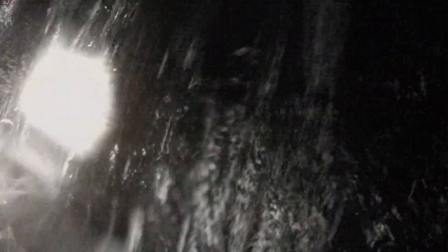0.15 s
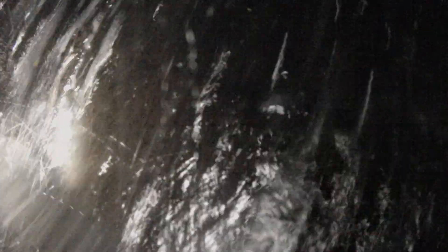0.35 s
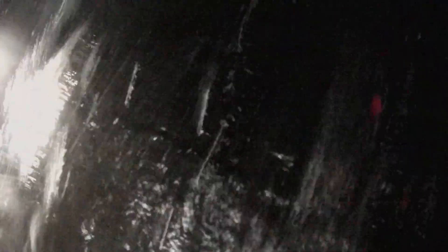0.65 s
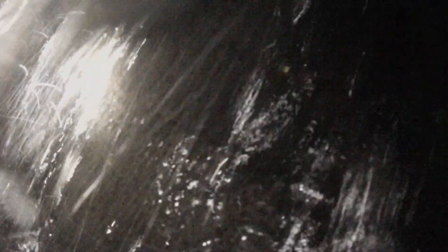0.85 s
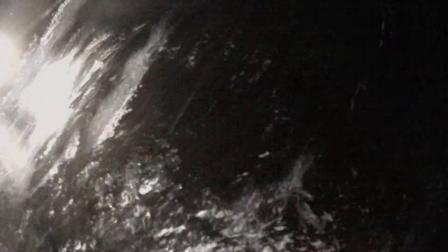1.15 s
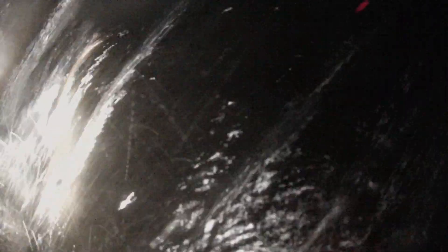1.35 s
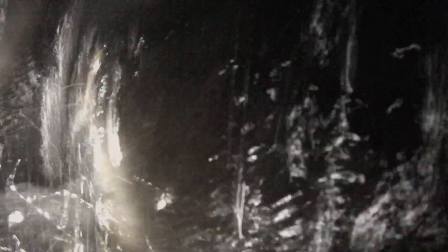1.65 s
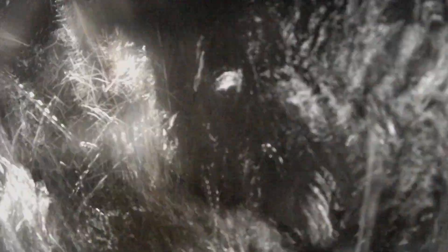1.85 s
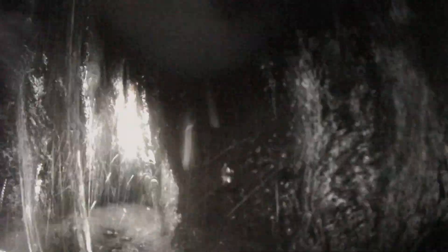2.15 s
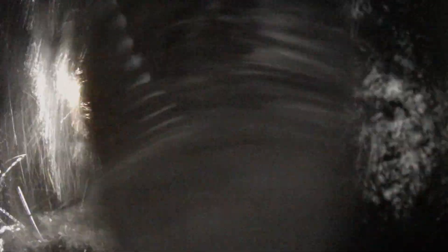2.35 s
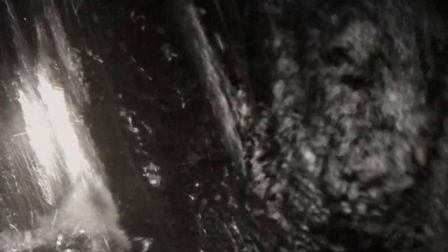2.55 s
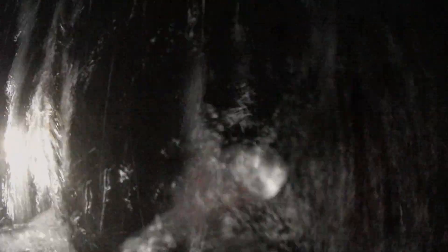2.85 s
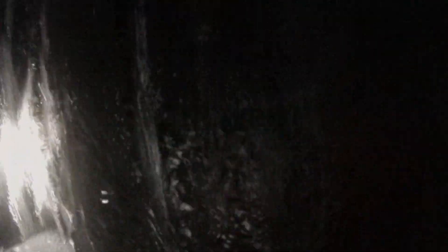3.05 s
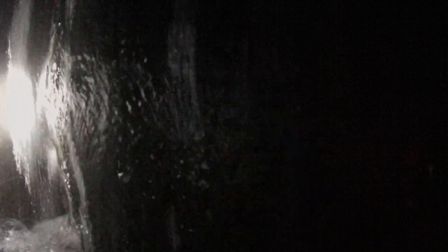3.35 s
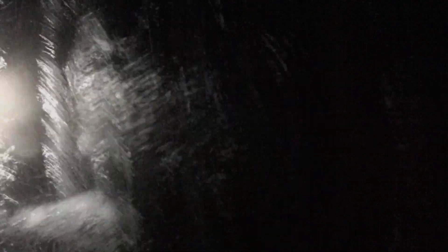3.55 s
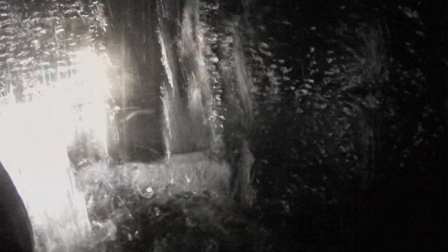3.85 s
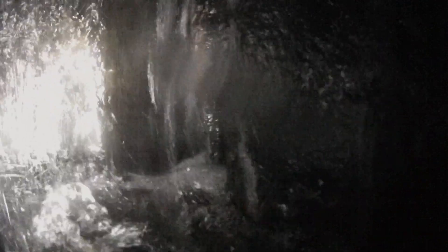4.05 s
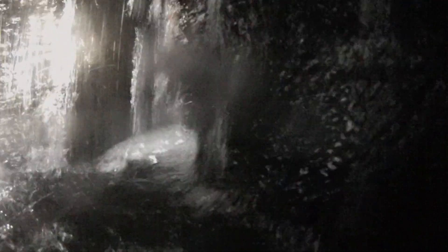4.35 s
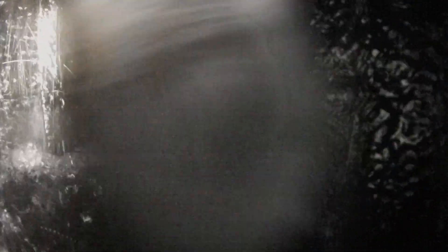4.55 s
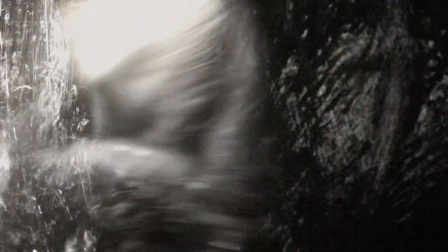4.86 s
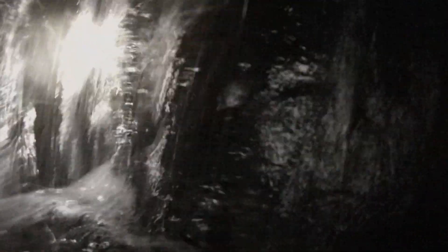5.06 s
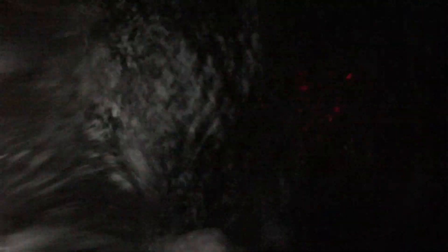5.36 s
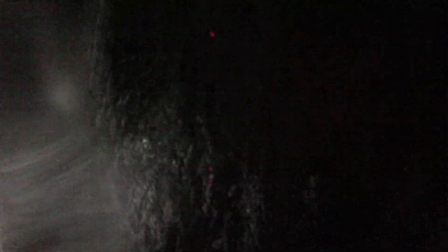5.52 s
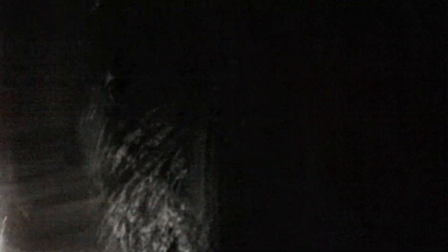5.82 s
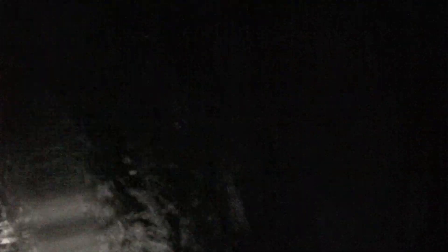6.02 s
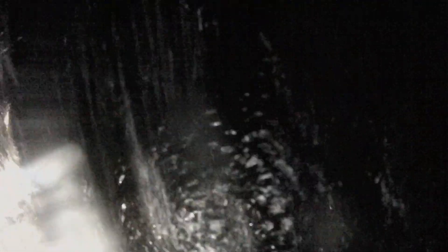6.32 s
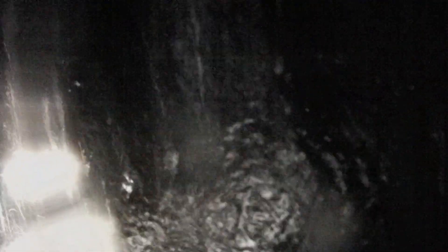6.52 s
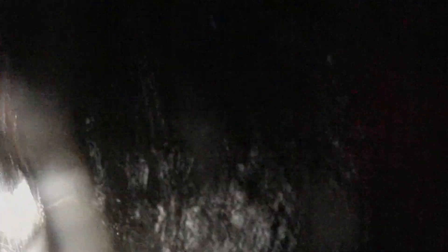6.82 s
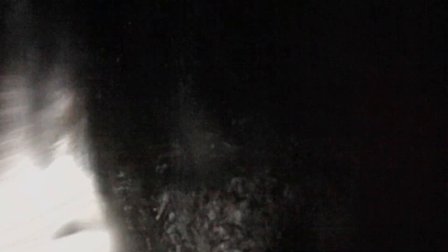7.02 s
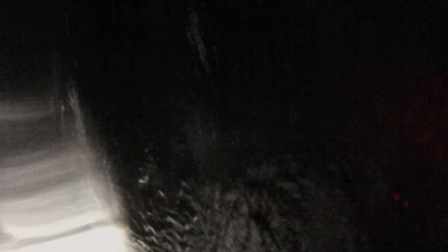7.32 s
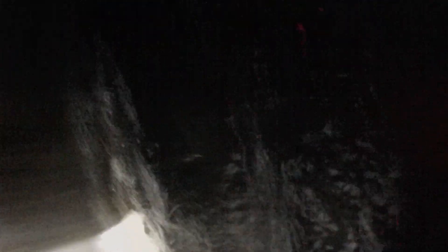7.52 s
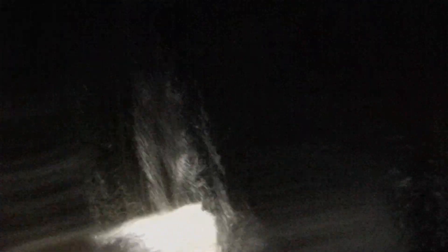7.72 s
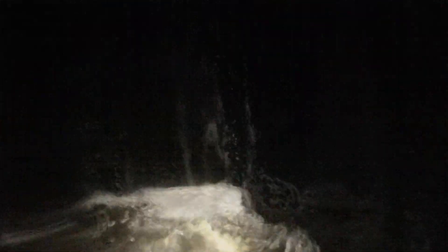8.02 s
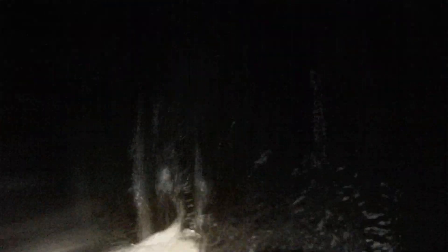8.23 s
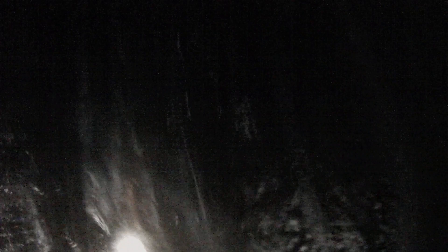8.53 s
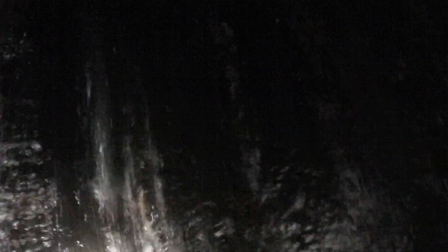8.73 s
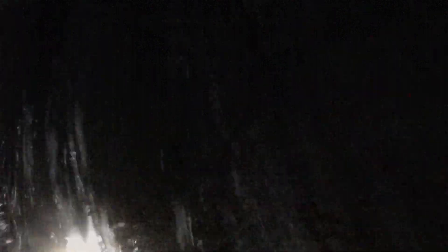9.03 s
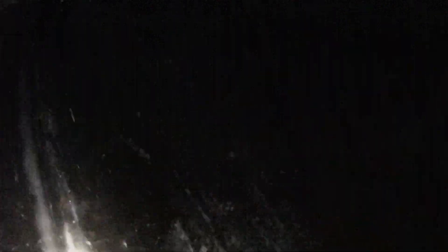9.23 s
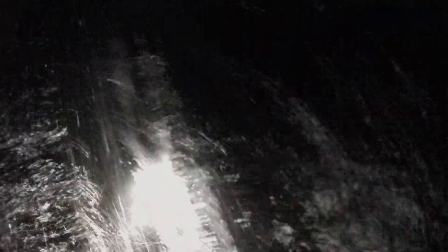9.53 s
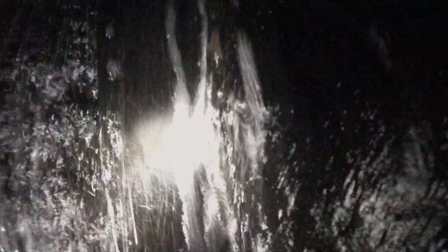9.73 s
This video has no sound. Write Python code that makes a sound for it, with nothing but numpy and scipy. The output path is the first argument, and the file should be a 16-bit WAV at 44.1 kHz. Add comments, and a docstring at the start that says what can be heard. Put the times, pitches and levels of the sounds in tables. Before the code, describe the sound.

Water spray hisses and patters right against the microphone case, dull thuds and sharp splats punctuating it, thinning before low rumble swells near the end.

```python
"""Inside a concrete dam outlet, a hand-held camera goes through falling spray: noise bubbles make a steady rush.
From the start, drops, gobs and droplets splat close on the housing: noise bursts lifted by the port's resonances.
From 1.5 s, bumps thud through the case as damped swings, knocks and beating modes; the hardest come near 3.8 and 5 s.
The hardest hits duck the gain, and the rush slowly swells back; around 7.5 s the spray thins.
From 8.3 s the rumble of draught and grip, lumpy low noise, grows until 9.35 s, then eases."""
import sys
import numpy as np
from scipy import signal
from scipy.fft import rfft, irfft, next_fast_len
from scipy.io import wavfile
from scipy.ndimage import uniform_filter1d, map_coordinates

SR = 44100
rng = np.random.default_rng(int(sys.argv[2]) if len(sys.argv) > 2 else 0)


def materialize(psi):
    """Save the field psi as 16-bit PCM at rate SR to the path in sys.argv[1].

    A 1-D psi becomes a single channel; in a 2-D psi each row is a channel.
    """
    bounded = np.clip(np.atleast_2d(psi).T, -1, 1)
    quanta = np.round(bounded * 32767).astype(np.int16)
    wavfile.write(sys.argv[1], SR, quanta)


N = 435708

# the falling sheet of water, duller when the microphone faces away: [t/s, level/dB, treble/dB]
RUSH_COURSE = [(0, -32.5, -0.5), (.85, -29.5, 0.5), (1.2, -31, .8), (1.7, -29.5, -2), (2.1, -30, 0.5),
               (2.6, -34.5, -1), (3.1, -33, 1.3), (4.0, -33, 1), (4.8, -27, -2.5), (5.2, -29, 0),
               (5.8, -31.5, -1), (6.3, -35.5, 0), (6.7, -31.5, 2), (7.2, -32.5, -1), (7.8, -37.5, -1),
               (8.5, -35, -2.5), (9.2, -32.5, 2.5), (9.87, -31, -1)]
# how thickly the spray falls on the housing: [t/s, level/dB]
SPRAY_COURSE = [(0, -31), (.6, -37), (1.35, -38), (1.9, -26), (2.3, -25), (2.65, -48.5), (2.87, -29),
                (3.5, -35), (3.7, -26), (4.6, -41), (5.02, -21), (5.3, -30), (5.5, -22), (6.1, -30),
                (6.45, -41.5), (6.67, -29), (7.18, -31), (7.5, -54), (8.25, -40), (9.05, -44), (9.33, -30),
                (9.87, -32)]
# draught and handling rumble: [t/s, level/dB]
RUMBLE_COURSE = [(0, -53), (1.2, -57.5), (1.9, -50.5), (2.6, -54), (3.5, -53.5), (4.8, -41.5), (5.3, -48),
                 (6.4, -44), (7.3, -43.5), (7.7, -48), (8.3, -51.5), (8.8, -39.5), (9.35, -36.5),
                 (9.87, -46.5)]
# hard drops that strike the housing: [t/s, splat peak/dB, centre f/Hz, burst length/s]
HARD_DROPS = [(0.4058, -3, 2320, 0.0052), (0.526, -6.5, 2040, .0024), (.612, -8.5, 2170, 0.0026),
              (.933, 8.5, 2990, 0.0012), (1.755, -7.5, 2230, 0.0049), (1.7806, 5.5, 4120, .006),
              (1.947, 7.5, 4270, 0.00074), (2.03, -2, 2030, 0.011), (2.084, -3.5, 1730, 0.0034),
              (2.135, 1, 3850, 0.0082), (2.249, -2, 2560, .0026), (2.302, -6, 10200, .002),
              (2.431, 3, 2100, .0017), (2.5087, -5, 7500, .0037), (2.5723, -3, 2200, 0.0049),
              (2.5853, -0.5, 6340, 0.0015), (2.9534, -7, 2290, 0.0044), (3.1244, -4.5, 1970, .0033),
              (3.318, -8, 6500, 0.0023), (3.3626, -4, 1780, .004), (3.6635, 6.5, 1030, 0.0075),
              (3.752, 1.5, 3000, 0.0037), (3.8244, 16, 1770, 0.0013), (4.629, -1, 2490, .0066),
              (5.2572, 9, 2660, 0.0049), (5.385, -1.5, 2730, 0.0014), (5.443, 0.5, 2480, .004),
              (5.4793, 4.5, 2420, 0.0039), (6.4672, -3.5, 6030, 0.0024), (6.586, -6, 3000, 0.0019),
              (6.779, 11, 2380, 0.0025), (6.8908, 7, 5200, 0.0016), (7.112, -5, 3740, .002),
              (7.227, -6.5, 2320, 0.0026), (7.299, -1.5, 2870, 0.0054), (7.411, -7.5, 5460, 0.0023),
              (7.4761, 5, 5740, 0.0011), (7.6846, 1, 4570, 0.0024), (8.0247, 0, 7430, 0.00084),
              (8.085, 6, 2540, 0.0038), (8.106, -3, 7000, 0.0018), (8.126, 0.5, 4000, 0.0011),
              (8.164, -5.5, 9440, 0.0016), (8.567, -4, 2660, 0.0013), (8.631, -6, 2920, .0015),
              (8.694, 0.5, 4200, 0.00035), (8.7752, -6.5, 1690, 0.0026), (8.904, -5, 2720, 0.004),
              (9.425, 1, 5930, 0.00062), (9.434, -4.5, 6800, 0.0046), (9.569, -6.5, 2980, 0.0048),
              (9.687, -4.5, 7270, 0.0025), (9.711, -7, 2250, 0.0033), (9.767, -3, 1650, 0.0034)]
# soft gobs of water that slap over the microphone port: [t/s, splat peak/dB, burst length/s]
LOUD_SLAPS = [(.1986, -0.5, 0.0054), (1.6565, -10, 0.0094), (1.805, -3.5, .002), (1.864, 2, 0.0036),
              (1.887, -6.5, 0.01), (1.908, -7, 0.0074), (2.021, 6, 0.012), (2.153, -4, 0.013),
              (2.167, -3.5, 0.011), (2.274, -4, 0.01), (2.92, -5.5, 0.0053), (2.931, -4.5, 0.0084),
              (3.065, -4.5, 0.0035), (3.497, -2.5, 0.0026), (3.673, -2.5, 0.011), (3.714, -8, .003),
              (4.931, 2.5, 0.0082), (4.971, -9.5, 0.004), (5.485, -5, 0.0086), (5.5654, 5.5, 0.0058),
              (5.7245, -3, 0.0067), (5.889, -5, .007), (5.904, -5, 0.0067), (5.9244, 1, 0.0018),
              (5.935, 1, 0.0048), (5.9975, -8.5, 0.0075), (6.07, -1, 0.0047), (6.214, -4.5, .003),
              (6.751, -1, .007), (6.953, -0.5, 0.0068), (6.981, 1.5, 0.0031), (7.1414, -5, 0.0026),
              (7.172, 0, 0.0029), (7.332, -6, 0.0028), (7.546, -5.5, 0.0028)]
# bumps on the case: [t/s, push/dB, push f/Hz, case ring/dB, knock/dB]
BUMPS = [(1.485, -48, 170, -22.5, -42), (1.576, -40, 139, -19.5, -36), (1.884, -20.5, 45, -28, -40),
         (2.124, -15.5, 57, -21, -21), (3.6634, -34, 200, -3, 5.5), (3.725, -2, 315, 4, 8),
         (3.7356, -2, 300, -4.5, 3), (3.825, 9, 324, 0, 11.5), (3.933, -1.5, 403, 0, -6.5),
         (4.335, -23, 143, -20, -34), (4.99, 12.5, 260, 5.5, -8), (5.545, -32, 284, -9, -5.5),
         (5.749, -22.5, 74, -33, -40), (5.925, -3.5, 109, -22.5, -11), (5.979, -13, 153, -27, -31),
         (6.142, -41, 220, -13, -26), (6.234, -19.5, 152, -36.5, -30), (6.699, -9.5, 194, -8.5, -11),
         (6.708, -10, 152, -11, -21), (7.169, -7, 170, -4, -9), (7.257, -14, 151, -17.5, -40),
         (7.42, -20.5, 130, -26, -31), (9.173, -15, 55, -26, -9.5), (9.335, -18.5, 100, -25.5, -27),
         (9.427, -20, 110, -24, -33)]
# relative spectrum of the rush, ahead of the port: [f/Hz, level per Hz/dB]
RUSH_SPECTRUM = [(30, -14), (172, -14), (238, -2), (320, -13.5), (500, -12), (770, -9), (1100, -13),
                 (1750, -1.5), (2300, -3), (4000, -8.5), (5700, -7), (8200, -13), (12500, -10.5),
                 (15300, -20.5)]
# relative spectrum of the spray, ahead of the port: [f/Hz, level per Hz/dB]
SPRAY_SPECTRUM = [(40, -18), (178, -12), (238, 0), (320, -16), (500, -33), (780, -6), (1200, -3),
                  (2200, 0.5), (3600, -4), (4400, -21.5), (7000, -32), (15000, -34)]
# relative spectrum of the rumble: [f/Hz, level per Hz/dB]
RUMBLE_SPECTRUM = [(10, -20), (30, -4.5), (90, -6.5), (180, -6.5), (400, -31), (1200, -52)]
# relative spectrum of a bump's dull knock: [f/Hz, level per Hz/dB]
KNOCK_SPECTRUM = [(60, -1), (300, -16.5), (1100, 2), (2400, -5.5), (5000, -33.5), (15000, -56)]
# resonances of the housing and its microphone port: [f/Hz, width/Hz, lift/dB]
PORT_RESONANCES = [(755, 204, 7.5), (2178, 644, 12), (2467, 190, 3), (2630, 61, -2), (3482, 274, 8),
                   (5670, 870, 10), (7300, 600, 8.5), (9480, 1650, 6)]

CASE_HZ = 227.6  # nominal pitch of the upper of the case's two low modes
TOP_HZ = 15450  # nothing is kept above this
SLAP_HZ, SLAP_TOP_HZ = 2925, 3870  # nominal centre and upper edge of the dull slaps
# upper edge of the splash of a drop centred on TOP_AT_HZ; the edge is higher for higher drops
DROP_TOP_HZ, TOP_AT_HZ, TOP_GROWS = 11900, 2950, 0.4
DROP_Q, PURER_HZ = 0.75, 3100  # the higher a drop's centre, the narrower its band


def rush(fizz_db, flutter_db, hiss_flutter_db):
    """The sheet of water breaks into countless bursting bubbles; body and hiss each surge on their own."""
    fizz = rng.standard_normal((2, N)) * amp(fizz_db * wobble(1500))
    low_pass = signal.butter(2, 3600, fs=SR, output="sos")
    high_pass = signal.butter(2, 3600, "high", fs=SR, output="sos")
    body = signal.sosfilt(low_pass, fizz[0]) * amp(flutter_db * wobble(45))
    treble_db = curve(RUSH_COURSE, order=2) + hiss_flutter_db * wobble(30)
    hiss = signal.sosfilt(high_pass, fizz[1]) * amp(treble_db)
    spectrum = shape(RUSH_SPECTRUM)
    water = coloured(body + hiss, lambda hz: spectrum(hz) + 0.54 * port(hz))
    return amp(curve(RUSH_COURSE)) * unit(water)


def drops(case_db):
    """Full drops splat on the housing: higher ones are narrower in band and ring the case less."""
    out, t = np.zeros(N), np.arange(SR // 12) / SR
    for s, db, centre_hz, length in HARD_DROPS:
        q = DROP_Q + centre_hz / PURER_HZ
        top_hz = DROP_TOP_HZ * (centre_hz / TOP_AT_HZ) ** TOP_GROWS
        hit = splat(t, centre_hz, top_hz, length, q=q, spatter_db=-37.5, spatter_t60=0.058)
        weight = min(1, 2200 / centre_hz) * amp(case_db)
        add(out, s, amp(db) * (hit + weight * case_ring(t, t60=0.081)))
    return out


def slaps(rows, case_db):
    """Gobs of water flatten over the port, each at a slightly different pitch, and stir the case."""
    out, t = np.zeros(N), np.arange(SR // 12) / SR
    for s, db, length in rows:
        centre_hz = SLAP_HZ * np.exp(rng.normal(0, 0.089))
        hit = splat(t, centre_hz, SLAP_TOP_HZ, length, q=1.28, spatter_db=-27, spatter_t60=0.043)
        add(out, s, amp(db) * (hit + amp(case_db) * case_ring(t, t60=0.098)))
    return out


def small_slaps(level_db, scatter_db, length, count):
    """Rows of lesser slaps, which come more often where the spray is thick."""
    fallen = np.cumsum(amp(curve(SPRAY_COURSE)))
    when, size, spread = rng.random((count, 3)).T
    # one slap in each equal share of the fallen spray
    share = (np.arange(count) + when) / count
    times = np.searchsorted(fallen / fallen[-1], share) / SR
    levels_db = level_db + scatter_db * (2 * size - 1)
    return list(zip(times, levels_db, length * np.exp(spread - 0.5)))


def splat(t, centre_hz, top_hz, length, q, spatter_db, spatter_t60, ping=0.52, glide=0.14):
    """One drop of peak 1 bursts as it flattens, then spatters; soft drops lack treble and ring the port more."""
    # the spatter's level jumps 400 times a second
    unevenness = np.repeat(amp(rng.normal(0, 6.4, len(t))), SR // 400)[:len(t)]
    spatter = amp(spatter_db - 60 * t / spatter_t60) * unevenness
    age = t / max(length, 1e-4)
    burst = np.exp(-age ** 2)
    ringing = np.clip((6500 / top_hz) ** 0.55, 0.4, 1.5)

    def colour(hz):
        """A bell round the centre, cut at the upper edge and lifted by the port, in dB."""
        detune = (hz + 120) / centre_hz - centre_hz / (hz + 120)
        bell_db = -10 * np.log10(1 + (q * detune) ** 2)
        edge_db = -10 * np.log10(1 + (hz / top_hz) ** 8)
        return bell_db + edge_db + ringing * port(hz)

    splash = crest(coloured((burst + spatter) * rng.standard_normal(len(t)), colour))
    # air caught under the drop rings for an instant, falling in pitch as the film spreads
    air_hz = centre_hz * np.exp(glide * (1 - 2 * np.minimum(age, 2)))
    air = np.sin(2 * np.pi * np.cumsum(air_hz) / SR) * burst
    return crest(splash + ping * air / (1 + length / 0.0015))


def thumps(knock_t60, rattle_db):
    """A bump shoves the air in the port once, knocks with a short rattle, and leaves the case ringing."""
    out, t = np.zeros(N), np.arange(SR // 5) / SR
    for s, push, push_hz, ring, knock in BUMPS:
        # the rattle's level jumps 300 times a second
        rattle = np.repeat(amp(rattle_db * (2 * rng.random(len(t)) - 1.5)), SR // 300)[:len(t)]
        contact = amp(-60 * t / 0.012) + 0.42 * rattle * amp(-60 * t / knock_t60)
        rap = crest(coloured(rng.standard_normal(len(t)) * contact, shape(KNOCK_SPECTRUM)))
        body = case_ring(t, t60=0.095, sag=0.08 * min(1, amp(ring + 2)))
        add(out, s, amp(knock) * rap - amp(push) * shove(t, push_hz) - amp(ring) * body)
    return out


def shove(t, hz):
    """One heavily damped swing of the air in the port, peak 1."""
    cycles = hz * t
    return crest(np.sin(2 * np.pi * cycles) * np.exp(-(cycles / 0.92) ** 2))


def case_ring(t, t60, sag=0):
    """The case's low pair of modes beat; they differ a little at each blow and are flatter by the sag."""
    phase = 2 * np.pi * CASE_HZ * np.exp(rng.normal(0, 0.033) - sag) * t
    upper = np.sin(phase)
    lower = 0.5 * np.sin(rng.uniform(0.77, 0.97) * phase) * amp(-30 * t / t60)
    return (upper + lower) * amp(-60 * t / t60) / np.sqrt(2)


def port(hz):
    """The lift in dB that the port's resonances give to water sounds."""
    return sum(db / (1 + (2 * (hz - centre) / width) ** 2) for centre, width, db in PORT_RESONANCES)


def spray(rate, scatter_db, clump_db, life):
    """Tiny droplets patter on the housing in clumps, each a decaying burst of noise."""
    landed = rng.random(N) < rate / SR
    size_db = scatter_db * np.clip(rng.standard_normal(N), -2, 2) + clump_db * wobble(28)
    sizes = landed * amp(size_db)
    t = np.arange(SR // 20) / SR
    # overlapping bursts add in power
    power = signal.fftconvolve(sizes ** 2, np.exp(-2 * t / life))[:N]
    bursts = np.sqrt(np.abs(power))
    spectrum = shape(SPRAY_SPECTRUM)
    patter = coloured(bursts * rng.standard_normal(N), lambda hz: spectrum(hz) + port(hz))
    return amp(curve(SPRAY_COURSE)) * unit(patter)


def droplets(level_db, scatter_db, centre_hz, length, case_db, count):
    """Single droplets tick at random, each in its own register, harder where the spray is thick."""
    out, t, spray_db = np.zeros(N), np.arange(SR // 16) / SR, curve(SPRAY_COURSE)
    starts = rng.integers(0, N, count)
    traits = np.clip(rng.standard_normal((count, 4)), -1.8, 1.8)
    for at, (size, pitch, life, hardness) in zip(starts, traits):
        hz = centre_hz * np.exp(0.38 * pitch)
        top_hz = 2.54 * hz * np.exp(0.46 * hardness)
        burst_s = length * np.exp(0.35 * life)
        tick = splat(t, hz, top_hz, burst_s, q=2.1, spatter_db=-24, spatter_t60=0.025)
        tick_db = level_db + 0.4 * spray_db[at] + scatter_db * size
        add(out, at / SR, amp(tick_db) * (tick + amp(case_db) * case_ring(t, t60=0.12)))
    return out


def jolts(level_db, scatter_db, centre_hz, case_db, count):
    """Small soft jolts from the grip and from water slapping the case swing the air and ring the case."""
    out, t, rumble_db = np.zeros(N), np.arange(SR // 8) / SR, curve(RUMBLE_COURSE)
    starts = rng.integers(0, N, count)
    traits = np.clip(rng.standard_normal((count, 2)), -1.7, 1.7)
    for at, (size, pitch) in zip(starts, traits):
        hz = centre_hz * np.exp(0.45 * pitch)
        jolt = shove(t, hz) + amp(case_db) * hz / CASE_HZ * case_ring(t, t60=0.039)
        jolt_db = level_db + rumble_db[at] + scatter_db * size
        add(out, at / SR, amp(jolt_db) * rng.choice([-1, 1]) * jolt)
    return out


def rumble(lump_db):
    """Draught from the falling water and the grip on the case make a lumpy low noise."""
    lumps = rng.standard_normal(N) * amp(lump_db * wobble(18))
    return amp(curve(RUMBLE_COURSE)) * unit(coloured(lumps, shape(RUMBLE_SPECTRUM)))


def amp(db):
    """Decibels to gain."""
    return 10 ** (np.asarray(db) / 20)


def unit(x):
    """Scale to rms 1."""
    return x / np.sqrt(np.mean(x ** 2) + 1e-20)


def crest(x):
    """Scale to peak 1."""
    return x / (np.abs(x).max() + 1e-12)


def curve(rows, order=1):
    """One value per sample from a column of (t/s, ..) rows."""
    columns = np.transpose(rows)
    return np.interp(np.arange(N) / SR, columns[0], columns[order])


def wobble(rate):
    """A smooth random curve, rate knots a second."""
    knots = rng.standard_normal(int(N * rate / SR) + 4)
    return map_coordinates(knots, [np.arange(N) * rate / SR])


def shape(points):
    """(f/Hz, level/dB) points as a function of frequency, on a log axis."""
    f, db = np.transpose(points)
    return lambda hz: np.interp(np.log(hz + 1), np.log(f + 1), db)


def coloured(x, db_of):
    """Causal minimum-phase filter whose gain in dB is a function of frequency."""
    m = 2 * next_fast_len(len(x))
    log_gain = db_of(np.fft.rfftfreq(m, 1 / SR)) * np.log(10) / 20
    # folding the cepstrum onto positive times makes the filter causal
    cepstrum = irfft(log_gain, m)
    cepstrum[1:m // 2] *= 2
    cepstrum[m // 2 + 1:] = 0
    return irfft(rfft(x, m) * np.exp(rfft(cepstrum)), m)[:len(x)]


def add(track, s, sound):
    """Mix a sound into the track at time s."""
    part = track[max(0, round(s * SR)):][:len(sound)]
    part += sound[:len(part)]


def scene():
    """The rush all around, and the water and bumps close up on the camera itself."""
    water = rush(fizz_db=3, flutter_db=2.0, hiss_flutter_db=1.75)
    lesser = small_slaps(level_db=-11.5, scatter_db=4, length=0.0044, count=44)
    splats = drops(case_db=-27.5) + slaps(LOUD_SLAPS + lesser, case_db=-32.5)
    bumps = thumps(knock_t60=0.074, rattle_db=5)
    patter = spray(rate=220, scatter_db=5.5, clump_db=4.0, life=0.0031)
    plops = droplets(level_db=-3, scatter_db=2.5, centre_hz=2295, length=0.0021, case_db=-18.5, count=280)
    ticks = droplets(level_db=-4.5, scatter_db=5.5, centre_hz=7920, length=0.001, case_db=-44, count=95)
    handling = jolts(level_db=11.5, scatter_db=3.5, centre_hz=106, case_db=-19, count=150)
    handling += rumble(lump_db=5.5)
    return (water + splats + bumps + patter + plops + ticks + handling)[None]


def record(dry):
    """Gain control ducks on a peak, down to a limit, and recovers steadily; what overshoots is clipped."""
    ceiling_db, deepest_db, recovery_db_per_s = -1.5, 17, 13
    level_db = 20 * np.log10(np.abs(dry[0]) + 1e-9)
    over_db = np.clip(level_db - ceiling_db, 0, deepest_db)
    # hold the deepest duck so far, less what has since recovered
    recovered = recovery_db_per_s * np.arange(N) / SR
    duck_db = np.maximum.accumulate(over_db + recovered) - recovered
    duck_db = uniform_filter1d(duck_db, size=41, origin=20)  # the attack takes about a millisecond
    clipped = np.clip(dry * amp(-duck_db), -1, 1)
    m = next_fast_len(N + SR // 2)
    kept = np.fft.rfftfreq(m, 1 / SR) < TOP_HZ
    return irfft(rfft(clipped, m) * kept, m)[:, :N]


dry = scene()
out = record(dry)
materialize(out)
```